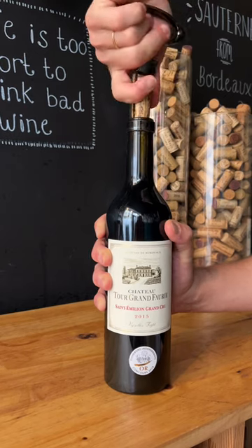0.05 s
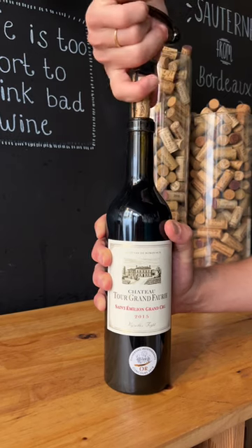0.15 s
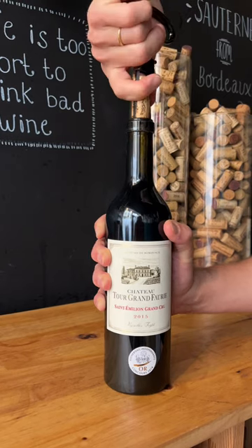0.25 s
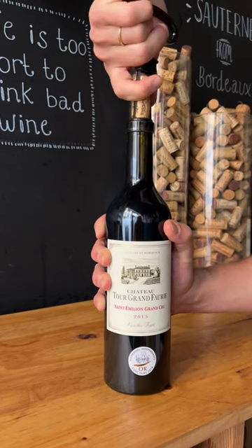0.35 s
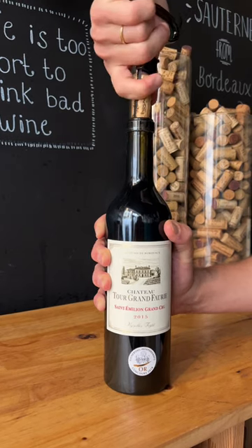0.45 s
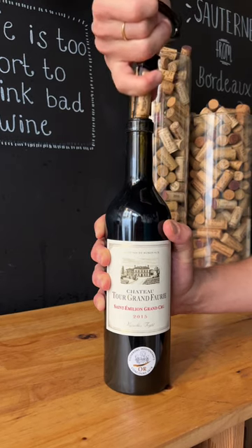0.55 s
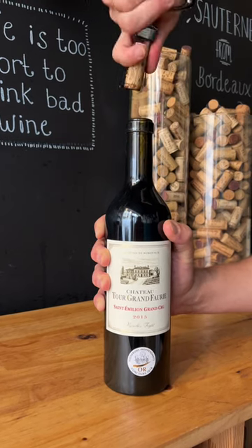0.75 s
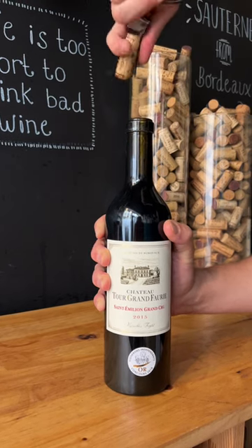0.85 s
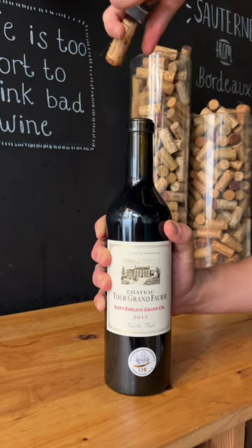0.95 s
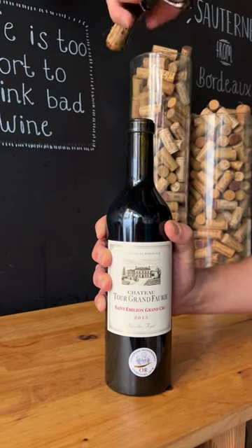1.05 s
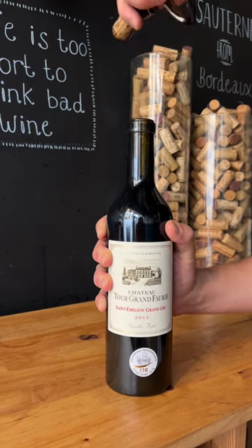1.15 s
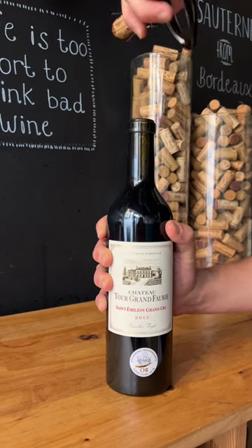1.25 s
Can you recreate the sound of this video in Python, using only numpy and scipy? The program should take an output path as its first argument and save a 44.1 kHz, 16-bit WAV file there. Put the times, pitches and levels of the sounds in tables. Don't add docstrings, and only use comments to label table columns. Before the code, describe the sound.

Close stereo sound of a wine bottle being opened in a quiet room: sharp crack and short bottle hum over a wooden thud, a pause, a weaker airy cork pop with a knock, then tiny hand rustles over low room hum.

```python
import sys
import numpy as np
from scipy import signal
from scipy.fft import rfft, irfft
from scipy.io import wavfile
from scipy.ndimage import uniform_filter1d

SR = 44100
rng = np.random.default_rng(int(sys.argv[2]) if len(sys.argv) > 2 else 0)


def wrap_up_sound(samples):
    columns = np.atleast_2d(samples).T
    tamed = np.clip(columns, -1, 1)
    steps = np.round(tamed * 32767).astype(np.int16)
    wavfile.write(sys.argv[1], SR, steps)


def invert_db(level):
    return 10 ** (np.asarray(level, dtype=float) / 20)


N = 57330

SIDE = np.array([[.5], [-.5]])
GRIP_S = .2540
CORK_S = .53


def read(points, hz):
    f, value = np.transpose(points)
    return np.interp(np.log(hz + 1), np.log(f + 1), value)


def evened(x):
    return x / np.sqrt(np.mean(x ** 2) + 1e-20)


def since(s):
    return np.maximum(np.arange(N) / SR - s, 0)


def pan(left_right_db):
    return invert_db(SIDE * left_right_db)


def coloured(x, points, lag_s=0):
    hz = np.fft.rfftfreq(N, 1 / SR)
    delay = np.exp(-2j * np.pi * hz * lag_s)
    return irfft(rfft(x) * invert_db(read(points, hz)) * delay, N)


def ring(modes):
    t, out = np.arange(SR // 2) / SR, 0
    for (hz, db, t60, pan_db), turn in zip(modes, rng.uniform(-1.2, 1, len(modes))):
        wave = np.sin(2 * np.pi * hz * t + 2.1 * turn * SIDE)
        onset = np.minimum(t * hz, 1)
        out = out + invert_db(db + SIDE * pan_db - 60 * t / t60) * wave * onset
    return out


def struck(force, modes):
    return signal.fftconvolve(np.atleast_2d(force), ring(modes), axes=1)[:, :N]


def push(s, db, length_s):
    u = np.clip(since(s) / length_s, 0, 1)
    return invert_db(db) * np.sin(np.pi * u) * np.pi / (2 * length_s * SR)


def swelling(s, swell_s):
    u = since(s) / swell_s
    return u * np.exp(.5 - u * u / 2)


def grip():
    close_s = 0.023
    return invert_db(-8.5 * np.clip(since(GRIP_S) / close_s, 0, 1))


def flutter():
    slow = uniform_filter1d(uniform_filter1d(rng.standard_normal(N), size=441), size=441)
    return invert_db(6 * evened(slow))


def room_tone():
    # pitch_hz, likeness (-1 to 1)
    likeness = [(60, 0.72), (240, 0.69), (950, -0.8), (3770, -0.39), (15000, 0.01)]
    # pitch_hz, level_db (per Hz)
    hum_colour = [(25, -24), (50, 6.5), (75, -7), (115, -6), (300, -17), (700, -22), (1500, -30),
                  (6200, -44), (12800, -51.5), (16000, -62)]
    frames, hz = N // 256 + 5, np.fft.rfftfreq(1024, 1 / SR)
    a, b, c, d, patches = rng.standard_normal((frames, 513, 5)).T
    patches = uniform_filter1d(uniform_filter1d(patches, size=10, axis=0), size=12, axis=1)
    same = np.clip(read(likeness, hz), -1, 1)[:, None]
    left = a + 1j * b
    right = same * left + np.sqrt(1 - same ** 2) * (c + 1j * d)
    spectrum = np.array([left, right]) * invert_db(1.6 * evened(patches))
    noise = signal.istft(spectrum, nperseg=1024, noverlap=768)[1][:, :N]
    return invert_db(-58.5) * evened(coloured(noise, hum_colour)) * pan(3)


def table():
    # pitch_hz, level_db, t60_s, left_right_db
    wood_modes = [(93.8, -10, 0.2, 7), (225.3, -5.5, 0.36, 0), (266.4, -0.5, 0.078, 7),
                  (352.1, -2.5, 0.12, 6), (489, -8, 0.045, 0), (730, -19, .06, 3.5)]
    thump_starts = [.2092, .2280, .2440, .5720, .1420, .1650, .3800]
    # level_db, push_s
    thumps = [(-24, 0.00091), (-33, 0.00079), (-39, 0.00049), (-38.5, 0.003), (-55, 0.00055),
              (-40.5, 0.0029), (-42.5, 0.0025)]
    sway_starts = [.2150, .2220, .2650, .2920, .3480, .3950, .4350, .5680, .5820, .6050, .6720, .2850,
                   .3650]
    # pitch_hz, level_db, swell_s, left_right_db
    sways = [(135, -28.5, 0.01997, 6.5), (184.7, -32.5, 0.023, 5), (128.5, -32.5, 0.0094, 4.5),
             (115.7, -35, 0.054, 4.5), (114, -40.5, 0.0052, 6.5), (105, -44.5, 0.0099, -1.5),
             (101.7, -52, 0.012, 6), (130.4, -37, 0.0054, 2.5), (166, -35.5, 0.0096, 4),
             (89.5, -42.5, 0.025, 5), (96.2, -48, 0.015, 7), (252, -42, .013, 1), (221, -43, 0.01, -4)]
    t = since(0)
    out = invert_db(-47 - 60 * t) * np.sin(2 * np.pi * 96 * t + 9.0) * pan(10)
    for s, (hz, db, swell_s, pan_db) in zip(sway_starts, sways):
        wave = np.sin(2 * np.pi * hz * since(s) + 0.64 * SIDE)
        out = out + invert_db(db) * pan(pan_db) * swelling(s, swell_s) * wave
    before = sum(push(s, *row) for s, row in zip(thump_starts, thumps) if s < GRIP_S)
    after = sum(push(s, *row) for s, row in zip(thump_starts, thumps) if s >= GRIP_S)
    return out + grip() * struck(before, wood_modes) + struck(after, wood_modes)


def tinks():
    rub_starts = [.936, .958, .944, 1.015, .945, 1.150, 1.150, .015, .020, .001, .140, .735, .700, .800,
                  .186, .931, .553, 1.02, .95]
    rub_pitches = [1380, 6200, 2200, 5000, 900, 1320, 2300, 5250, 3300, 700, 800, 830, 550, 1790, 7700,
                   4000, 3000, 1400, 3400]
    # width_hz, level_db, t60_s
    rubs = [(370, -64, 0.77), (59.7, -65.5, 0.12), (897, -70, 0.62), (1994, -74.5, 0.63), (640, -68, 0.63),
            (500, -64, 0.074), (907, -69.5, 0.047), (400, -81, 0.51), (302, -80.5, 0.36), (1000, -65, .5),
            (809, -58, 0.04), (138.89, -65, 0.35), (315, -69, 0.71), (242.7, -84.5, 8.4), (150, -67.5, .1),
            (3050, -66, 0.069), (4040, -53, 0.095), (149.4, -71, 0.52), (493, -75.5, 0.66)]
    out, t, rise_s = 0, since(0), .004
    noises = rng.standard_normal((len(rubs), 4, N))
    for s, hz, (width, db, t60), noise in zip(rub_starts, rub_pitches, rubs, noises):
        r = np.exp(-np.pi * width / SR)
        slow = signal.lfilter([1], [1, -2 * r, r * r], noise[:2] + 1j * (noise[2:] + noise[0]))
        band = evened((slow * np.exp(2j * np.pi * hz * t)).real)
        out = out + band * invert_db(db - 60 * since(s) / t60) * np.minimum(since(s) / rise_s, 1)
    return out * pan(3)


def cracks():
    crack_starts = [.2031, .2163, .5595, .5801, .5730, .2186, .8660, .9170, .9310, .9465, .6090]
    # level_db, rise_s, fall_s, kind (0 = lever on glass, 1 = cork leaving)
    bursts = [(-34.5, 0.00049, 0.0058, 0), (-25, 0.0012, 0.0026, 0), (-39, 0.0067, 0.00277, 1),
              (-32, 0.000326, 0.0033, 1), (-47, 0.0015, 0.013, 1), (-23, 0.00097, 0.003, 0),
              (-71, .0005, 0.0017, 1), (-76, 0.00044, 0.0015, 1), (-66, 0.00055, .0025, 1),
              (-63, .0004, 0.00117, 1), (-47.5, 0.0012, 0.0042, 1)]
    # pitch_hz, level_db (per Hz)
    lever_colour = [(180, -39.5), (300, -7), (907, -3.5), (2930, -3), (3410, -4.5), (6030, -1.5),
                    (10500, -9.5), (15400, -5.5), (16500, -12)]
    # pitch_hz, level_db (per Hz)
    cork_colour = [(800, -4.5), (2300, -8.5), (2800, -5), (3800, -4), (8000, -1.5), (10100, -14),
                   (12300, -6.5), (16500, -10.5)]
    glass_pitches = [1290, 1879, 2496, 2820, 2931, 3870, 4363, 4942, 5222, 5980, 7700]
    # level_db, t60_s, left_right_db
    glass_rows = [(-17.5, 0.069, -2), (-26, .07, -4.5), (-17, 0.059, -11.5), (-37.5, .05, -1),
                  (-15.5, .05, 3), (-19.5, 0.063, 9.5), (-26.5, 0.034, 5.5), (-25.5, 0.076, 6.5),
                  (-25, 0.093, 5.5), (-19, 0.025, 6), (-29, 0.16, 14.5)]
    cork_changes = [-7, -12, 2.5, -26, 0.5, 6.5, -21, -10, -12, -2, -6]

    a, b, grit = rng.standard_normal((3, N))
    grit = invert_db(0.87 * evened(uniform_filter1d(grit, size=12)))
    shared, lag_s = 0.17, -0.000094
    right = shared * coloured(a, [(1, 0), (2, 0)], lag_s) + np.sqrt(1 - shared ** 2) * b
    raw = np.array([a, right])
    hisses = [evened(coloured(raw, colour)) for colour in (lever_colour, cork_colour)]
    air = 0
    for s, (db, rise, fall, kind) in zip(crack_starts, bursts):
        attack = np.minimum(since(s) / rise, 1)
        decay = np.exp(-(np.maximum(since(s) - rise, 0) / fall) ** 2)
        air = air + grit * invert_db(db) * attack * decay * hisses[int(kind > .5)]

    glass = [(hz, *row) for hz, row in zip(glass_pitches, glass_rows)]
    corked = [(hz, db + more_db - 3, 0.83 * t60, pan_db)
              for (hz, db, t60, pan_db), more_db in zip(glass, cork_changes)]
    late = since(CORK_S) > 0
    touching = since(.7) == 0
    rung = struck(air[0] * ~late, glass) + struck(air[0] * late * touching, corked)
    return air * pan(3), invert_db(-18) * flutter() * rung


def body():
    # pitch_hz, level_db, t60_s, left_right_db
    bottle_modes = [(905, -13, 0.12, 12), (891, -9, 0.1, 10.5), (899, -15, .14, 7.5)]
    # start_s, level_db
    blows = [
        (.2050, -49),
        (.5780, -46),
    ]
    swell_starts = [.268, .290, .312, .368, .400, .440, .590, .630, .670]
    # pitch_hz, level_db, swell_s
    swells = [(892, -42, 0.012), (928, -41, 0.0081), (893, -42, 0.0079), (881, -51.5, 0.015),
              (888, -62.5, 0.021), (903, -67, .015), (882, -58.5, 0.015), (895, -64.5, 0.016),
              (902, -66, 0.01)]
    hum_s, from_hz, to_hz, rise_s = .2110, 885, 887.6, 0.011
    port_phase = np.array([[0], [.8]])
    t = since(hum_s)
    hz = from_hz + (to_hz - from_hz) * np.minimum(t / (GRIP_S - hum_s), 1)
    stopped = grip() * invert_db(-600.0 * since(GRIP_S))
    loudness = invert_db(-28) * np.minimum(t / rise_s, 1) * stopped
    hum = loudness * np.sin(2 * np.pi * np.cumsum(hz) / SR + port_phase) * invert_db(np.array([[3.], [-4.]]))
    for s, (hz, db, swell_s) in zip(swell_starts, swells):
        wave = np.sin(2 * np.pi * hz * since(s) + port_phase)
        hum = hum + invert_db(db) * pan(6) * swelling(s, swell_s) * wave
    force = sum(push(s, db, 0.00047) for s, db in blows)
    return hum + flutter() * struck(force, bottle_modes)


def pop():
    pop_s, from_hz, to_hz, glide_s = .5660, 538, 1210, 0.00902
    t60_s, sag_hz_per_s = 0.23, 900
    t = since(pop_s)
    hz = to_hz + (from_hz - to_hz) * np.exp(-(t / glide_s) ** 2.6)
    hz = hz - sag_hz_per_s * np.minimum(t, .12)
    wave = np.sin(2 * np.pi * np.cumsum(hz * (t > 0)) / SR)
    loudness = invert_db(-46.5 - 60 * t / t60_s) * np.minimum(t / 0.0025, 1)
    wobble = 1 + 0.48 * np.cos(2 * np.pi * 110 * t - 2.2)
    return wave * loudness * wobble * pan(5)


def room(x):
    # pitch_hz, t60_s
    fading = [(100, 1), (260, 0.9), (700, .45), (1840, 0.57), (4850, 0.51), (9000, 0.42), (14000, 0.25)]
    # pitch_hz, level_db
    echo_colour = [(100, -2.5), (300, -2.5), (900, 1), (2000, -2.5), (6000, -1.5), (9500, -7.5),
                   (15500, -3)]
    a, b = rng.standard_normal((2, SR))
    noise = np.array([a, 0.1 * np.roll(a, shift=-5) + 0.79 * b])
    hz, t, z = signal.stft(noise, SR, nperseg=256)
    z = z * invert_db(-60 * t / read(fading, hz)[:, None])
    tail = signal.istft(z, SR, nperseg=256)[1][:, :SR]
    tail = tail * np.clip(np.arange(SR) / SR / 0.0066 - .4, 0, 1)
    tail = tail / np.linalg.norm(tail[0])
    return coloured(signal.fftconvolve(x, tail, axes=1)[:, :N], echo_colour)


def housed(x, share):
    # pitch_hz, width_hz, level_db
    dips = [(10350, 360, -34), (13950, 380, -30)]
    edge_hz, edge_db_per_hz = 16050, .05
    hz = np.fft.rfftfreq(N, 1 / SR)
    dips_db = sum(db * np.exp(-((hz - at_hz) / width) ** 4) for at_hz, width, db in dips)
    edge_db = (share + 1) / 2 * edge_db_per_hz * np.maximum(hz - edge_hz, 0)
    return irfft(rfft(x) * invert_db(share * dips_db - edge_db), N)


def scene():
    wood, (air, glass), hum, neck = table(), cracks(), body(), pop()
    sent = air + invert_db(-6.5) * glass + invert_db(-5) * neck
    sent = sent * invert_db(-5 * np.sign(since(CORK_S)))
    sent = sent + invert_db(-13.0) * wood + invert_db(-17.5) * hum
    near = wood + hum + air + glass + neck
    return housed(near, 0.64) + housed(room(sent) + tinks() + room_tone(), 0.91)


def top_cut(x):
    return signal.sosfilt(signal.butter(12, 16970, fs=SR, output="sos"), x)


def record(dry):
    bass_cut = signal.butter(2, 37, "highpass", fs=SR, output="sos")
    return top_cut(signal.sosfilt(bass_cut, dry))


dry = scene()
out = record(dry)
wrap_up_sound(out)
```